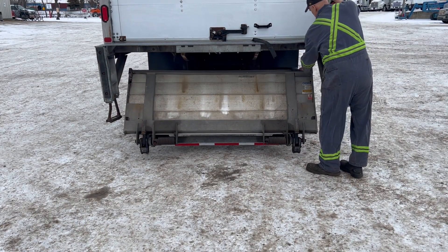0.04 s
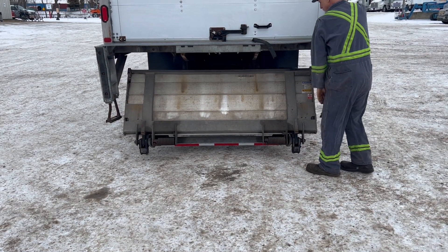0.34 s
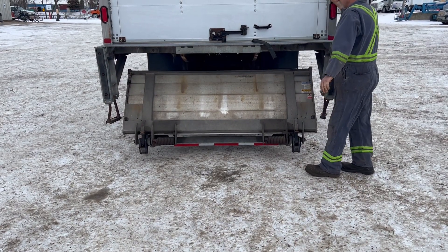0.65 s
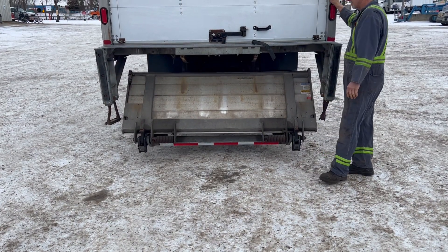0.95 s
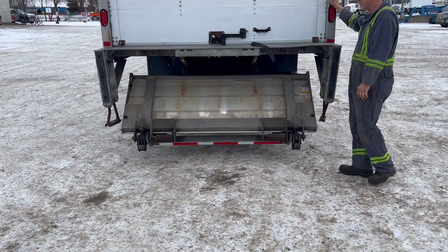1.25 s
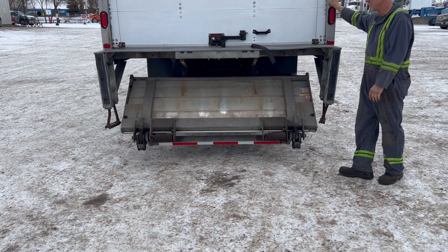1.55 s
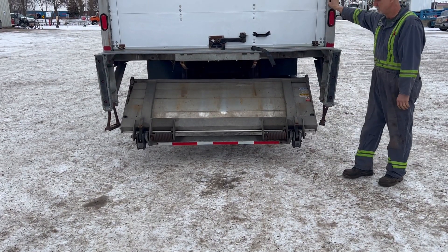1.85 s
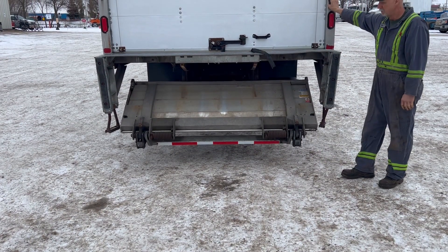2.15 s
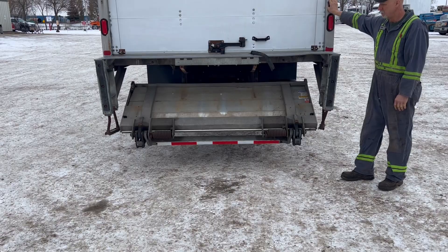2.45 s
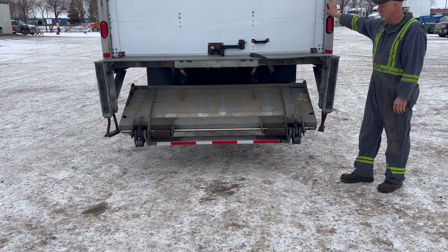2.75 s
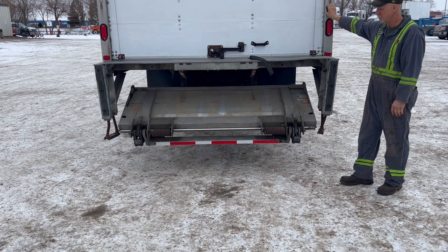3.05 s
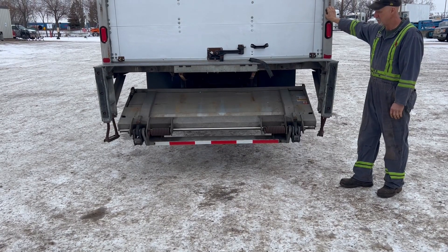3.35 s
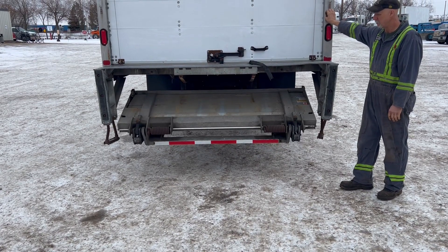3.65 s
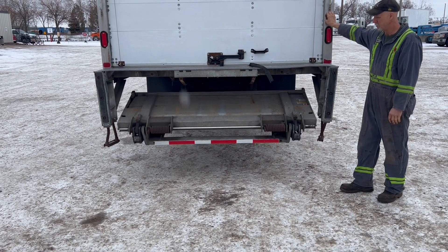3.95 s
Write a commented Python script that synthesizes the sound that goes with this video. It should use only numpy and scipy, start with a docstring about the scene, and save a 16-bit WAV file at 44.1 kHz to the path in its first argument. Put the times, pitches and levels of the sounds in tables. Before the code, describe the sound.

A truck lift gate's hydraulic motor whines steadily after a loud metal clank and rattle.

```python
"""Steel clanks and rattles to rest: blows ring the platform of a truck's lift gate in an open yard.
Half a second in, the electric hydraulic pump spins up and whines at its tooth rate, slowing in two
steps as it takes the weight. The motor's brushes sing and sizzle in the treble, oil and fan hiss,
and the platform's arms rasp softly. Far engines rumble behind it, and a low drone swells late."""
import sys
import numpy as np
from scipy import signal
from scipy.io import wavfile

SR = 44100
rng = np.random.default_rng(int(sys.argv[2]) if len(sys.argv) > 2 else 0)


def digitize_waveform(pressure):
    """Quantize a signal to 16-bit integers and store it at the path in sys.argv[1].

    Rows of a 2-D input are taken as channels; values are limited to [-1, 1].
    """
    field = np.atleast_2d(pressure).T
    bounded = np.clip(field, -1, 1)
    quanta = np.round(bounded * 32767).astype(np.int16)
    wavfile.write(sys.argv[1], SR, quanta)


N = 176400
TIME = np.arange(N) / SR

# blows on the platform: t/s, bass/dB, middle/dB, treble/dB, contact/s
BLOWS = [(0, -17.5, -17, -23.5, 0.0012), (.025, -15, -7.5, -12.5, 0.0043), (.058, -16.5, -30, -43, 0.0021),
         (0.072, -48, -34, -21.5, 0.0032), (0.096, -23.5, -30.5, -14.5, 0.014),
         (.124, -22.5, -23, -43, 0.00367), (0.165, -23.5, -46, -58, 0.0034),
         (0.197, -21.5, -46, -46, 0.0013), (.226, -50, -26, -43.5, 0.0068), (0.25, -19.5, -43, -50, 0.0025),
         (0.28, -20, -30.5, -34, .004), (0.304, -20, -29.5, -56, 0.0026), (.356, -24.5, -29.5, -53, 0.005),
         (0.382, -25.5, -47, -52, 0.0012), (0.511, -31.5, -30, -77, 0.00773),
         (0.626, -44, -48, -38, 0.0017), (1.27, -54, -39.5, -57, 0.0125), (1.373, -55, -66, -44, 0.0011)]
def blow_gains(hz):
    """Strength of every blow at one frequency."""
    return from_db([at_hz([(252, bass), (765, middle), (5000, treble)], hz)
                    for _, bass, middle, treble, _ in BLOWS])


# dense ringing of the plate: f/Hz, band gain/dB
PLATE_SPECTRUM = [(50, -23.5), (100, -6.5), (160, -11.5), (240, -2.5), (370, -18), (600, -2.5), (850, -8.5),
                  (1200, -6), (1550, -5.5), (1950, -13), (2700, -10.5), (4000, -16), (6000, -22),
                  (8300, -19.5), (10500, -32)]
# plate balance: f/Hz, left-right/dB
PLATE_PAN = [(300, .5), (500, 0), (700, -6), (1000, 8.5), (1300, 0.5), (2400, 4.5), (4400, 8), (8000, 1.5)]
# decay of the crash: f/Hz, T60/s
CRASH_T60 = [(100, 0.22), (600, 0.15), (2500, 0.12), (10000, 0.14)]
# decay of its tail: f/Hz, T60/s
TAIL_T60 = [(100, 0.32), (600, 1), (2500, 0.81), (10000, 0.17)]
def platform_crash(tail_db=-20):
    """Each blow feeds the steel's dense modes during contact: a short crash and a longer tail."""
    contacts = np.array([np.diff(ramp(start, length), prepend=0) for start, *_, length in BLOWS])
    out = np.zeros((2, N))
    for hz, band in noise_bands():
        energy = blow_gains(hz) ** 2 @ contacts
        crash = power_decay(energy, at_hz(CRASH_T60, hz))
        tail = from_db(tail_db) ** 2 * power_decay(energy, at_hz(TAIL_T60, hz))
        envelope = np.sqrt(np.abs(crash + tail))
        out += from_db(at_hz(PLATE_SPECTRUM, hz)) * envelope * band * pan(at_hz(PLATE_PAN, hz))
    return out


# clear plate modes: f/Hz, gain/dB, T60/s
PLATE_MODES = [(230, -3, .6), (283.5, -1, 0.34), (463, -9, .3), (608, -1, 0.14), (645, -13, .2),
               (755, -9, 0.35), (866, -4, 0.13), (1212, -20, 0.43), (2325, -7, 0.08), (2790, -4, 0.11),
               (7343, -27, 0.45), (8296, -36, 0.35)]
def platform_ring(gain_db=-7, scatter_db=1.4):
    """Each blow kicks a few clear modes, which ring on as damped sines."""
    struck = [int((start + length / 2) * SR) for start, *_, length in BLOWS]
    out = np.zeros((2, N))
    for hz, db, t60 in PLATE_MODES:
        kicks = np.zeros(N)
        kicks[struck] = blow_gains(hz) * from_db(gain_db + db + rng.normal(0, scatter_db, len(BLOWS)))
        radius, step = from_db(-60 / (t60 * SR)), 2 * np.pi * hz / SR
        feedback = [1, -2 * radius * np.cos(step), radius ** 2]
        ring = signal.lfilter([0, np.sin(step)], feedback, kicks + 1e-18)
        out += ring * pan(at_hz(PLATE_PAN, hz))
    return out


START_S, TEETH = 0.497, 12
# motor shaft speed: t/s, f/Hz
SHAFT_SPEED = [(.505, 19), (.53, 32), (.56, 44.5), (.6, 54), (.65, 59.8), (.72, 63.1), (.82, 64.55),
               (.89, 64.55), (1.0, 63.25), (1.1, 62.7), (1.3, 62.65), (1.37, 61.95), (1.48, 61.66),
               (2.55, 61.68), (2.82, 61.08), (4, 61.0)]
def power_pack(jitter=0.00081):
    """One motor shaft drives the pump's whine and the brushes; oil and sparks start with it."""
    shaft_hz, = in_time(SHAFT_SPEED)
    shaft = phase_of(shaft_hz * (1 + jitter * drift(25)))
    hiss = oil_hiss()
    whine = ramp(START_S, 0.029) * (tooth_tone(shaft) + overtones(shaft) + growl(shaft))
    return whine + brushes(shaft, shaft_hz) + sparks() + hiss


# tooth tone: t/s, level/dB
TOOTH_LEVEL = [(.52, -43), (.62, -45.5), (.72, -37.5), (.8, -42), (.85, -39), (.93, -38), (.97, -44.5),
               (1.05, -36), (1.13, -50), (1.2, -44), (1.3, -49.5), (1.42, -40.5), (1.65, -42), (1.9, -45),
               (2.45, -45), (2.75, -52.5), (3.4, -56), (3.9, -48.5)]
# side tone: t/s, level/dB
SIDE_LEVEL = [(.6, -62), (.9, -54.5), (1.1, -84), (1.5, -58.5), (1.8, -68), (2.1, -57), (2.35, -53),
              (2.7, -58.5), (3.3, -64), (3.6, -65), (3.9, -54.5)]
def tooth_tone(shaft, roughness=0.092, rough_hz=40):
    """The pump's tooth rate, plus a side tone that beats with its second harmonic at the shaft rate."""
    tooth = gain_curve(TOOTH_LEVEL) * (1 + roughness * drift(rough_hz))
    side = gain_curve(SIDE_LEVEL) * (1 + roughness * drift(rough_hz))
    return (tooth * tone(TEETH * shaft, lead_rad=0.95) * pan(db=-2.5)
            + side * tone((2 * TEETH - 1) * shaft, lead_rad=0.2) * pan(db=-1.5))


# strong tooth overtones: harmonic -> t/s, level/dB
STRONG_OVERTONES = {2: [(.78, -56.5), (.84, -56), (1.0, -54), (1.1, -51), (1.3, -50.5), (1.42, -58.5),
                    (1.6, -55.5), (4, -55.5)], 3: [(.78, -72), (.87, -61), (.97, -67), (1.2, -60),
                    (1.5, -75), (2.5, -72), (2.7, -66.5)], 4: [(.75, -65), (.81, -84), (.92, -74),
                    (.97, -67.5), (2.3, -70), (2.76, -66), (3.1, -68), (3.5, -65), (3.8, -75)],
                    6: [(1.1, -79), (1.7, -70.5), (2.4, -69), (2.6, -82), (3.45, -79), (3.7, -76)],
                    7: [(1.5, -92), (2.9, -80), (3.45, -73.5), (4, -75)], 9: [(1.05, -78), (1.17, -68),
                    (1.38, -77), (1.65, -72), (1.9, -88), (3.8, -78)], 10: [(.9, -77), (2.2, -76),
                    (2.7, -65.5), (3.0, -68), (3.4, -59.5), (3.85, -76)], 11: [(.68, -80), (.74, -63),
                    (1.2, -79), (1.35, -67), (1.55, -86), (1.9, -80), (2.1, -72), (2.48, -65.5), (2.7, -87),
                    (3.55, -69)], 12: [(.62, -82), (.7, -63), (1.28, -69), (1.37, -52.5), (1.5, -62.5),
                    (1.8, -58.5), (2.19, -78), (2.28, -56), (2.45, -54), (2.65, -77), (3.0, -62),
                    (3.3, -77), (3.65, -64), (4, -87)], 13: [(.9, -70), (1.03, -60), (1.6, -57),
                    (2.55, -53.5), (2.72, -60), (2.9, -55), (3.22, -55.5), (3.36, -65), (3.48, -56.5),
                    (4, -50.5)]}
# faint tooth overtones: harmonic -> level/dB at light, half, full load
FAINT_OVERTONES = {5: (-88, -83, -76), 8: (-86, -89, -79), 14: (-72, -78, -82), 15: (-78, -74, -70),
                   16: (-88, -82, -82), 20: (-79, -86, -88), 21: (-110, -77, -80)}
# overtone balance: harmonic, left-right/dB
OVERTONE_PAN = [(2, -1), (3, 6), (4, 22), (9, 14), (10, 7), (12, 0)]
# overtone phase: harmonic, left lead/rad
OVERTONE_LEAD = [(2, 0.87), (3, 0.72), (10, 0.49), (13, 2.26), (14, 4), (16, 0.33)]
def overtones(shaft, load_steps_s=(1.26, 2.59), step_s=0.08, waver_db=0.17):
    """Tooth harmonics emerge ragged during spin-up, settle, and shift in balance with the load."""
    half_load, full_load = [ramp(t - step_s / 2, step_s) for t in load_steps_s]
    levels_db = {harmonic: in_time(curve)[0] for harmonic, curve in STRONG_OVERTONES.items()}
    for harmonic, (light_db, half_db, full_db) in FAINT_OVERTONES.items():
        levels_db[harmonic] = light_db + half_load * (half_db - light_db) + full_load * (full_db - half_db)
    onset = ramp(0.503, 0.11)
    raggedness = 0.6 - 0.44 * ramp(START_S, 1.0)
    out = np.zeros((2, N))
    for harmonic, db in levels_db.items():
        wobble = flutter(raggedness, rate_hz=45)
        gain = onset * np.abs(wobble) * from_db(db - waver_db * drift(6.8))
        phase = harmonic * TEETH * shaft + np.angle(wobble)
        out += gain * tone(phase, at_hz(OVERTONE_LEAD, harmonic)) * pan(at_hz(OVERTONE_PAN, harmonic))
    return out


# starting growl: t/s, gain/dB
GROWL_GAIN = [(.5, -25), (.525, -32), (.55, -39), (.575, -49), (.62, -49), (.8, -94)]
def growl(shaft, roughness=0.6, rough_hz=90):
    """The starting motor growls on two rough neighbouring shaft harmonics."""
    out = np.zeros((2, N))
    for multiple in (2 * TEETH - 1, 2 * TEETH):
        gain = gain_curve(GROWL_GAIN) * (1 + roughness * drift(rough_hz)) / 2
        out += gain * tone(multiple * shaft + roughness * drift(rough_hz), lead_rad=1.0)
    return out


# brush buzz shaped by the housing: f/Hz, line level/dB
BRUSH_SPECTRUM = [(1600, -82), (2200, -85), (2750, -85), (3200, -101), (6000, -101), (7200, -88),
                  (7800, -92), (8500, -79.5), (9350, -76), (10100, -104), (13000, -115)]
def brushes(shaft, shaft_hz, uneven_db=2.5, fading_db=3.5, flutter_rad=0.6):
    """Uneven commutator bars give a comb of fluttering lines that sweeps the housing's resonances."""
    out = np.zeros((2, N))
    for multiple in range(2 * TEETH + 1, 165):
        if multiple % TEETH:
            housing_db = at_hz(BRUSH_SPECTRUM, multiple * shaft_hz)
            db = housing_db + uneven_db * rng.normal() + fading_db * drift(0.44)
            phase = multiple * shaft + rng.uniform(0, 2 * np.pi) + flutter_rad * drift(18)
            out += from_db(db) * tone(phase, lead_rad=rng.uniform(0, np.pi))
    return ramp(START_S, 0.074) * out


def sparks(start_db=-63, running_db=-68):
    """The brushes sizzle, most while the starting current is high."""
    db = start_db + (running_db - start_db) * ramp(0.645, 0.16)
    return ramp(START_S, 0.074) * from_db(db) * band_noise(8875, 9625, order=4)


# oil and fan hiss: f/Hz, relative density/dB
OIL_SPECTRUM = [(300, -0.5), (500, 8), (800, 1), (1100, -5), (1500, -10.5), (2000, -9.5), (3000, -32.5),
                (4500, -28), (6500, -34), (9000, -42), (11000, -70), (15000, -64)]
# oil and fan hiss: t/s, level/dB
OIL_LEVEL = [(.5, -41.5), (.7, -47), (1.8, -46.5), (2.4, -46)]
def oil_hiss():
    """Oil and fan hiss once the motor runs."""
    return ramp(START_S, 0.044) * gain_curve(OIL_LEVEL) * coloured_noise(OIL_SPECTRUM, flicker_db=2)


# rasp of the arms: t/s, level/dB
SCRAPE_LEVEL = [(1.9, -88), (2.15, -68), (2.45, -66), (2.65, -66.5), (2.85, -92)]
def arm_scrape(flicker_db=1.5):
    """A soft rasp as the platform's arms turn."""
    rasp = band_noise(3600, 5800, order=2)
    return gain_curve(SCRAPE_LEVEL) * from_db(flicker_db * drift(30)) * rasp * pan(db=8)


# background drone: t/s, f/Hz, level/dB
DRONE = [(2.4, 182, -57), (2.8, 179, -39), (3.1, 178, -30), (3.4, 176, -42.5), (3.8, 173, -38.5),
         (4, 168, -36.5)]
def drone(waver=0.0066, flicker_db=2):
    """A low, wavering tone swells late and sinks in pitch."""
    hz, db = in_time(DRONE)
    phase = phase_of(hz * (1 + waver * drift(6.2)))
    return from_db(db + flicker_db * drift(17)) * tone(phase, lead_rad=0.1)


# engine bass: f/Hz, relative density/dB
RUMBLE_SPECTRUM = [(20, -40), (30, -23), (42, 3.5), (58, 6), (80, 3), (110, -14), (160, -20.5),
                   (400, -72.5)]
# engine bass: t/s, level/dB
RUMBLE_LEVEL = [(0, -30), (.3, -25), (.42, -30.5), (.6, -24), (1.4, -28.5), (2.1, -29.5), (2.75, -31),
                (2.95, -25), (3.35, -34), (3.55, -23.5), (4, -26)]
# engine roar and yard air: f/Hz, relative density/dB
ROAR_SPECTRUM = [(60, -11), (110, -1), (160, 2.5), (200, -3), (235, -5.5), (310, -10.5), (420, -21),
                 (1000, -31.5), (2500, -48.5), (6000, -53.5), (9500, -84), (11000, -91)]
# engine roar and yard air: t/s, level/dB
ROAR_LEVEL = [(0, -31.5), (.8, -35), (2.6, -34.5), (3.0, -33), (4, -32)]
def far_engines():
    """Distant engines rumble and roar in the air of the yard."""
    rumble = gain_curve(RUMBLE_LEVEL) * coloured_noise(RUMBLE_SPECTRUM, flicker_db=1.2)
    roar = gain_curve(ROAR_LEVEL) * coloured_noise(ROAR_SPECTRUM, flicker_db=2)
    return rumble + roar


# diffuse sound: f/Hz, left-right correlation
CORRELATION = [(60, 0.97), (290, 0.9), (640, 0.71), (1400, 0.3), (2400, 0.023), (4400, 1), (8000, 0.13)]
def noise_bands(right_delay_samples=2):
    """Yield third-octave bands of diffuse stereo noise: centre/Hz, noise of rms 1."""
    edges_hz = 20 * 2 ** (np.arange(30) / 3)
    white = rng.standard_normal((2, 2, N + SR // 4))
    for k, (low, high) in enumerate(zip(edges_hz, edges_hz[1:])):
        mid, side = band_pass(white[k % 2], low, high, order=3)[:, -N:]
        hz = np.sqrt(low * high)
        alike = np.clip(at_hz(CORRELATION, hz), -0.99, 0.99)
        left, right = np.sqrt(1 + alike) * mid + np.sqrt(1 - alike) * side * [[1], [-1]]
        yield hz, rms_one(np.array([left, np.roll(right, right_delay_samples)]))


def coloured_noise(spectrum, flicker_db):
    """Stereo noise of a given spectrum, each band flickering; rms 1."""
    return rms_one(sum(band * np.sqrt(hz) * from_db(at_hz(spectrum, hz) + flicker_db * drift(14))
                       for hz, band in noise_bands()))


def band_noise(low_hz, high_hz, order):
    """One band of uncorrelated stereo noise; rms 1."""
    return rms_one(band_pass(rng.standard_normal((2, N)), low_hz, high_hz, order))


def band_pass(x, low_hz, high_hz, order):
    """Flat-topped band filter."""
    return signal.sosfilt(signal.butter(order, [low_hz, high_hz], "band", fs=SR, output="sos"), x)


def drift(rate_hz, hop=100):
    """Smooth random wander; rms 1."""
    pole = np.exp(-2 * np.pi * rate_hz * hop / SR)
    white = rng.standard_normal(N // hop + 1002)
    slow = signal.lfilter([1], [1, -2 * pole, pole ** 2], white)[1000:]
    return np.interp(np.arange(N) / hop, np.arange(len(slow)), rms_one(slow))


def flutter(depth, rate_hz):
    """Random wobble of strength and phase, as a complex gain of rms 1."""
    return (1 + depth * (drift(rate_hz) + 1j * drift(rate_hz))) / np.sqrt(1 + 2 * depth ** 2)


def power_decay(energy, t60):
    """Stored energy, falling 60 dB in t60 seconds."""
    retained = from_db(-60 / (t60 * SR)) ** 2
    return signal.lfilter([1], [1, -retained], energy + 1e-18)


def tone(phase, lead_rad):
    """Stereo sine of rms 1, left side leading."""
    return np.sqrt(2) * np.sin([phase + lead_rad / 2, phase - lead_rad / 2])


def phase_of(hz):
    """Running phase/rad."""
    return 2 * np.pi * np.cumsum(hz) / SR


def ramp(start_s, length_s):
    """Linear rise from 0 to 1."""
    return np.clip((TIME - start_s) / length_s, 0, 1)


def in_time(rows):
    """The columns of a time curve, sample by sample."""
    times, *columns = np.transpose(rows)
    return [np.interp(TIME, times, column) for column in columns]


def gain_curve(rows):
    """A dB curve as gain per sample."""
    return from_db(in_time(rows)[0])


def at_hz(points, hz):
    """Interpolate on a log axis of frequency or harmonic number."""
    f, value = np.transpose(points)
    return np.interp(np.log(hz), np.log(f), value)


def pan(db):
    """Left and right gains for a level difference."""
    return rms_one(from_db(np.array([[db], [-db]]) / 2))


def from_db(db):
    """Decibels to gain."""
    return 10 ** (np.asarray(db) / 20)


def rms_one(x):
    """Scale to rms 1."""
    return x / np.sqrt(np.mean(x ** 2) + 1e-20)


def scene():
    """Platform, pump and yard together."""
    return platform_crash() + platform_ring() + arm_scrape() + power_pack() + drone() + far_engines()


def record(dry, ceiling=1.3, stopband_hz=16700):
    """Round the peaks and cut the top."""
    rounded = ceiling * np.tanh(dry / ceiling)
    return signal.sosfilt(signal.cheby2(14, 70, stopband_hz, fs=SR, output="sos"), rounded)


dry = scene()
out = record(dry)
digitize_waveform(out)
```